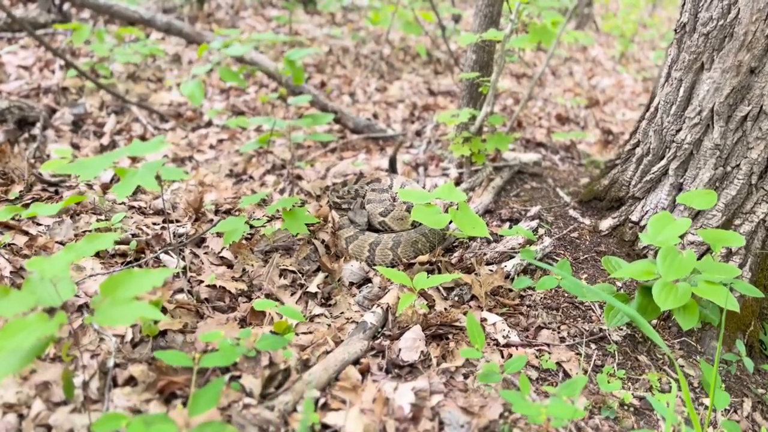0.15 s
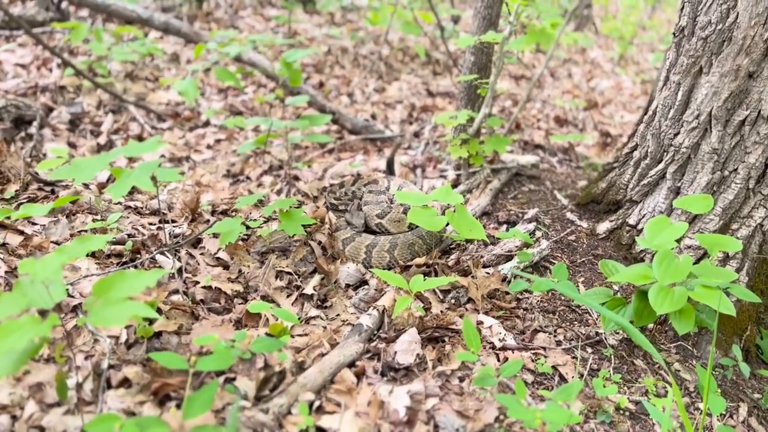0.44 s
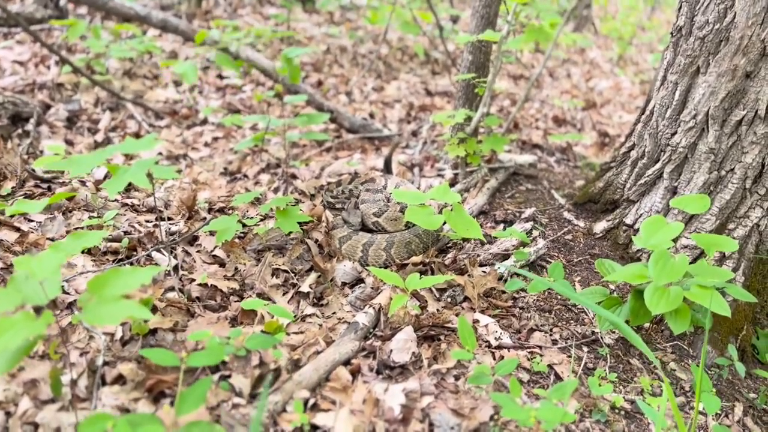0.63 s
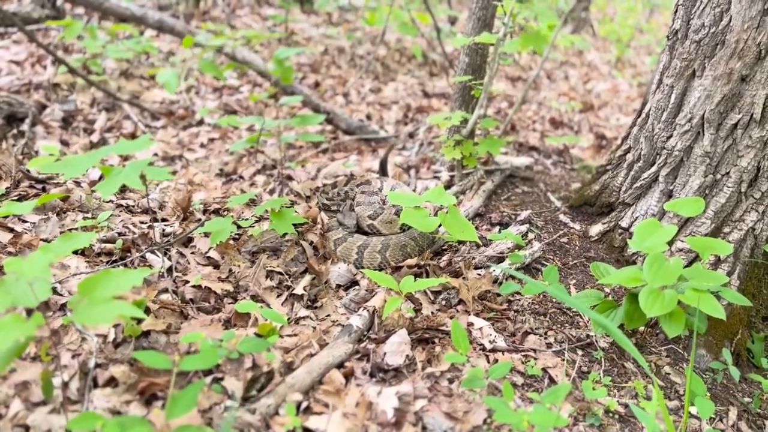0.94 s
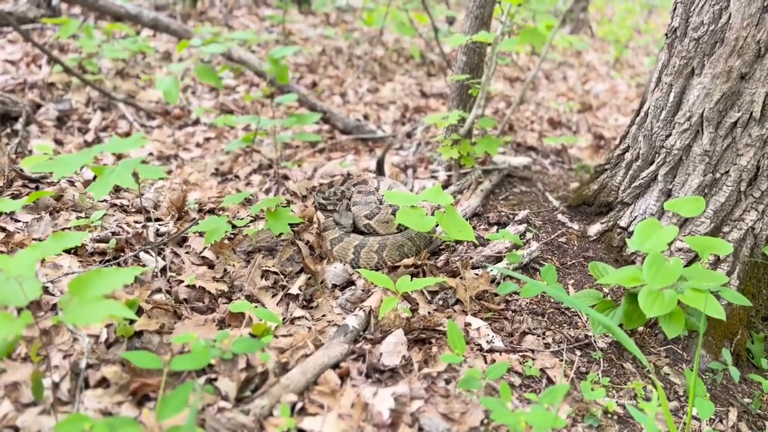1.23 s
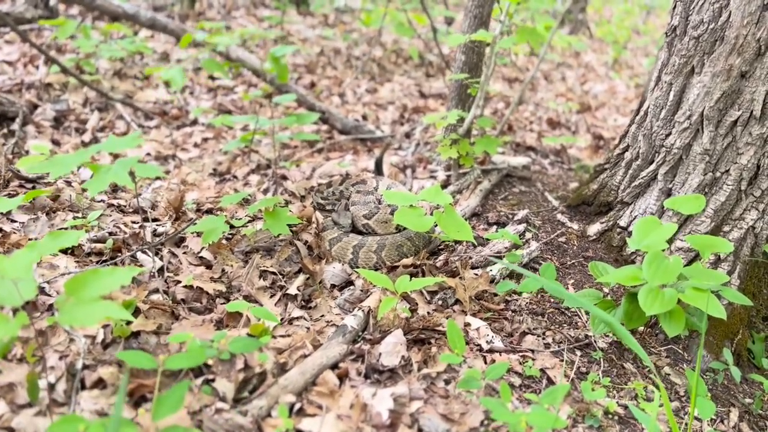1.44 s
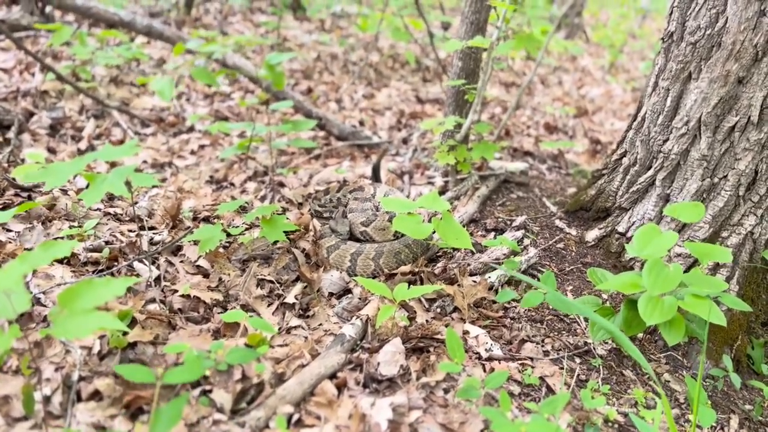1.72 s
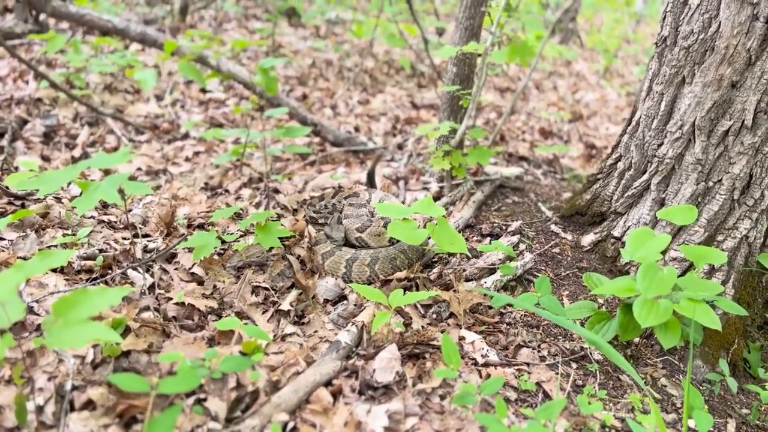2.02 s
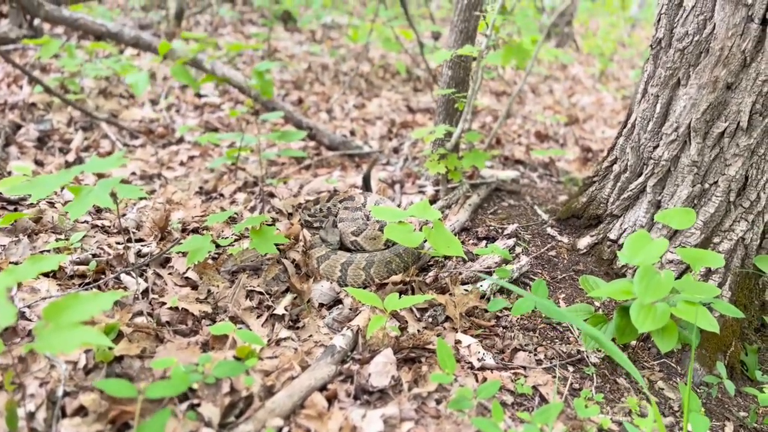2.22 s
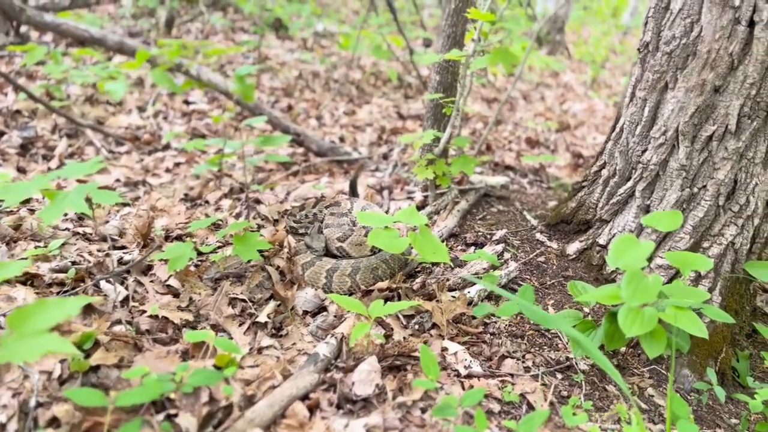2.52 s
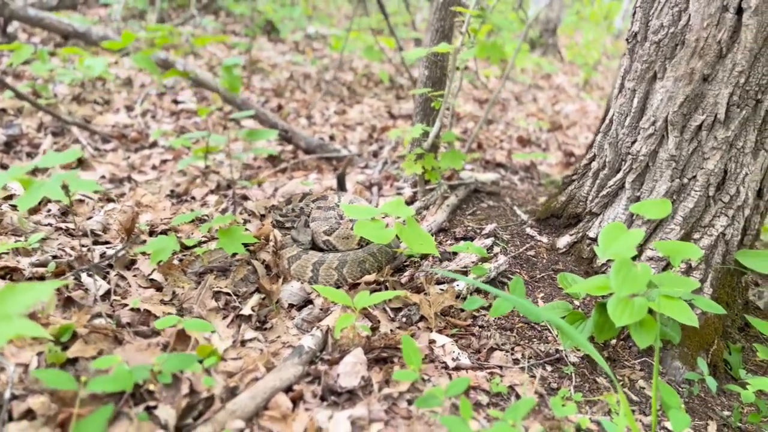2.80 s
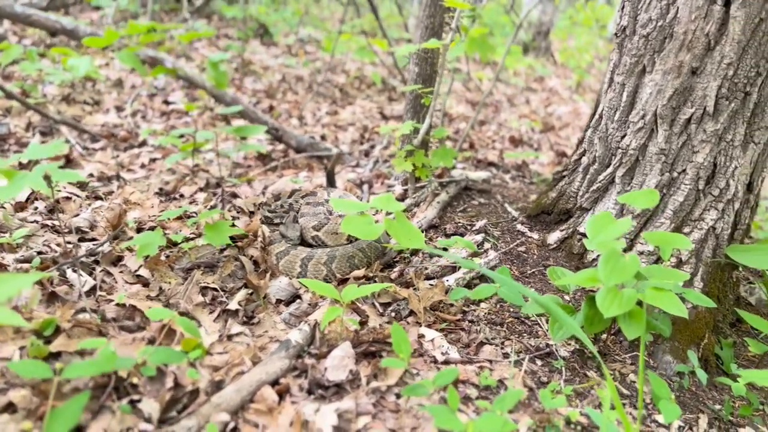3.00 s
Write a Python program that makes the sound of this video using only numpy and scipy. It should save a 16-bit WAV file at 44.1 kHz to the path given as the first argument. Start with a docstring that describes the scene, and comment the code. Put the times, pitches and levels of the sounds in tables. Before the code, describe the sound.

A rattlesnake shakes its tail in a fast, dry, high-pitched buzz that holds steady from start to finish. Beneath it, a quiet wood adds only a faint low rumble of air with a few soft bumps.

```python
"""A quiet wood: a rattlesnake on the leaf litter buzzes its tail without pause.
The tail swings fifty times a second; at each turn the loose horny segments clash.
The whole rattle knocks, the widest segments clack, the hollow shells chatter, the dry rims fizz.
Ground and trunks scatter the buzz, over a low rumble of air with soft bumps.
Faint tones swell and fade: a far hum, plus an overtone of the buzz near 850 Hz."""
import sys
import numpy as np
from scipy import signal
from scipy.fft import rfft, irfft
from scipy.io import wavfile

SR = 44100
rng = np.random.default_rng(int(sys.argv[2]) if len(sys.argv) > 2 else 0)


def generate_wav(signal):
    """Clip the signal to [-1, 1] and save it as 16-bit WAV at the path in sys.argv[1]."""
    frames = np.transpose(np.atleast_2d(signal))
    scaled = np.clip(frames, -1, 1) * 32767
    pcm = np.round(scaled).astype(np.int16)
    wavfile.write(sys.argv[1], SR, pcm)


N = 138915

# tail speed (time [s], swing rate [Hz])
SWING_RATE = [(0, 50.05), (.25, 49.75), (.45, 50.15), (1.2, 50.15), (1.6, 50.0), (2.2, 49.88),
              (3.15, 49.75)]
# clashes in one swing (place [swings], spread [swings], knock [dB], clack [dB], chatter [dB], fizz [dB])
CLASHES = [(.005, .022, -2.5, -0.5, 0.5, 1.5), (0.064, .02, -13, -3.5, -.5, -2.5),
           (0.331, .035, -4.5, -10, -7.5, -6), (.45, 0.044, -14, -7, -6.5, -2),
           (0.529, .025, -2.5, -7.5, -2.5, -.5), (.595, 0.023, -4.5, -9, -2, -6),
           (.8, .028, -5.5, -20, -5.5, -4.5), (0.921, 0.027, -3, 0.5, -1.5, -2)]
# whole rattle (frequency [Hz], level [dB])
KNOCK_SPECTRUM = [(200, -32.5), (550, -26), (800, -14), (1050, -6), (1300, 0), (1750, 1.5), (2080, -1),
                  (2320, 7), (2580, -2), (2900, 4), (3300, -2.5), (6000, -17)]
# widest segments (frequency [Hz], level [dB])
CLACK_SPECTRUM = [(500, -56), (2000, -26), (2650, -18), (2920, -9), (3210, -18.5), (3420, -3.5),
                  (3680, -1.5), (3850, -3), (4050, -5.5), (4500, -5.5), (5200, -13), (8000, -27.5)]
# hollow segments (frequency [Hz], level [dB])
SHELL_SPECTRUM = [(500, -74), (2000, -29), (3200, -19.5), (3900, -12), (4450, -5), (5500, -2), (7300, -2),
                  (8000, -5), (8500, -25), (11000, -21.5), (16000, -27)]
# hollow segment resonances (frequency [Hz], width [Hz], lift [dB])
SHELL_MODES = [(4875, 420, 6.5), (5270, 200, 1.2), (5836, 240, 6.2), (6410, 120, 3.2), (7010, 360, 3.3),
               (7830, 160, 2)]
# scraping rims (frequency [Hz], level [dB])
FIZZ_SPECTRUM = [(2000, -20.5), (5000, 0), (8000, -0.5), (9800, -.5), (10600, -1.5), (13000, -4),
                 (15100, -3.5), (15800, -1.5)]
# band of each rim (centre [Hz])
RIM_HZ = [6000, 8520, 9860, 11350, 12860, 14500]
# open-air rumble (frequency [Hz], level [dB])
AIR_SPECTRUM = [(15, 1.5), (30, 0.5), (65, -3), (95, -0.5), (120, 0.5), (175, -10), (215, -8), (300, -13.5),
                (520, -18.5), (1000, -16.5), (4000, -47)]
# far hum; last row: buzz overtone (frequency [Hz], level [dB], swell centre [s], swell width [s])
FAINT_TONES = [(420, -85, 1.42, 1), (477, -91, 0.48, 0.27), (723, -89, 0.56, 1), (855, -92, 2.8, 1.4)]
# bumps in the rumble (time [s], level [dB])
BUMPS = [(.16, -69), (.24, -62.5), (0.521, -64), (.88, -61), (1.009, -55), (2.099, -63), (2.41, -61),
         (2.56, -59), (2.75, -67), (2.962, -63)]

TIME_S = np.arange(N) / SR


def amp(db):
    """Decibels to gain."""
    return 10 ** (np.asarray(db) / 20)


def unit(x):
    """Scale to rms 1."""
    return x / np.sqrt(np.mean(x ** 2) + 1e-20)


def level_db(spectrum, hz):
    """Spectrum interpolated over log frequency."""
    points_hz, db = np.transpose(spectrum)
    return np.interp(np.log(hz + 1), np.log(points_hz), db)


def drift(hz):
    """Slow random motion up to about hz, rms 1."""
    bins_hz = np.fft.rfftfreq(N, 1 / SR)
    return unit(irfft(rfft(rng.standard_normal(N)) * (bins_hz > 0) * np.exp(-(bins_hz / hz) ** 2), N))


def ring(clicks, spectrum, modes=(), size=2048):
    """Clicks ring a minimum-phase body."""
    hz = abs(np.fft.fftfreq(size, 1 / SR))
    modes_db = sum(db / (1 + (2 * (hz - centre_hz) / width_hz) ** 2) for centre_hz, width_hz, db in modes)
    log_gain = np.log(amp(level_db(spectrum, hz) + modes_db))
    response = np.fft.ifft(np.exp(np.conj(signal.hilbert(log_gain)))).real
    return signal.oaconvolve(clicks, response[:size // 2])[:N]


def force(swings, clash_db, rest_db, rise_ratio=1.3):
    """Push between segments: each clash builds more slowly than it lets go."""
    power = amp(rest_db) ** 2
    for (place, spread, *_), db in zip(CLASHES, clash_db):
        away = (swings - place + .5) % 1 - .5
        width = spread * np.where(away < 0, rise_ratio, 1)
        power = power + amp(db) ** 2 * np.exp(-.5 * (away / width) ** 2)
    return unit(np.sqrt(power))


def contacts(push, rate_hz, spread_db):
    """Tiny random impacts, denser and harder with push; rate_hz holds at push 1."""
    hit = rng.random(N) < push * rate_hz / SR
    strength = amp(spread_db * np.clip(rng.standard_normal(N), -2, 2))
    return hit * strength * np.sqrt(push) * rng.choice([-1, 1], N)


def knock(swings, clash_db, jitter_s=.0003, spread_db=1.2, bounce_s=.000903, bounce_db=-3.5):
    """The whole rattle takes one blow and one rebound per clash, with rubbing around them."""
    rub = contacts(force(swings, clash_db, rest_db=-8), rate_hz=12000, spread_db=1.5)
    blows = np.zeros(N)
    for (place, *_), db in zip(CLASHES, clash_db):
        onsets = np.flatnonzero(np.diff(np.floor(swings - place)) > 0)
        late, hard, loose = rng.standard_normal((len(onsets), 3)).T
        for delay_s, drop_db in ((0, 0), (bounce_s * np.exp(.5 * loose), bounce_db)):
            at = onsets + np.round(SR * (jitter_s * late + delay_s)).astype(int)
            blows[np.clip(at, 0, N - 1)] += amp(db + drop_db + spread_db * hard)
    return ring(unit(blows) + amp(-2) * unit(rub), KNOCK_SPECTRUM)


def clack(swings, clash_db):
    """Impacts ring the widest segments."""
    push = force(swings, clash_db, rest_db=-6.5)
    return ring(contacts(push, rate_hz=6000, spread_db=2.5), CLACK_SPECTRUM)


def chatter(swings, clash_db):
    """Impacts ring the resonances of the hollow segments."""
    push = force(swings, clash_db, rest_db=-5)
    return ring(contacts(push, rate_hz=9000, spread_db=1), SHELL_SPECTRUM, SHELL_MODES)


def fizz(swings, clash_db, width_hz=2420, lift_db=20.5):
    """Dry rims scrape, each favouring its own band."""
    push = force(swings, clash_db, rest_db=-3.5)
    out = 0
    for hz in RIM_HZ:
        scrape = contacts(push, rate_hz=22000 / len(RIM_HZ), spread_db=4)
        out = out + ring(scrape, FIZZ_SPECTRUM, [(hz, width_hz, lift_db)])
    return out


def rattle(first_turn_s=.0045, stroke_spread_db=.17, drift_db=.04):
    """The swinging tail drives the segments, each stroke with slightly different effort."""
    swing_hz = np.interp(TIME_S, *np.transpose(SWING_RATE))
    swings = np.cumsum(swing_hz) / SR - first_turn_s * swing_hz[0]
    stroke = np.round(2 * swings).astype(int)
    effort = amp(stroke_spread_db * rng.standard_normal(N)[stroke] + drift_db * drift(hz=5.5))
    _, _, knock_db, clack_db, chatter_db, fizz_db = np.transpose(CLASHES)
    return effort * (amp(-58) * unit(knock(swings, knock_db))
                     + amp(-46) * unit(clack(swings, clack_db))
                     + amp(-39) * unit(chatter(swings, chatter_db))
                     + amp(-43.5) * unit(fizz(swings, fizz_db)))


def scatter(buzz, paths=10, delay_s=.0033, t60_s=.77):
    """Ground, leaves and trunks return the buzz; the paths crossfade as the tail moves."""
    age_s = np.arange(SR // 2) / SR
    position = np.linspace(0, paths - 1, N)
    out = 0
    for path in range(paths):
        share = np.cos(np.pi / 2 * np.clip(position - path, -1, 1))
        echo = rng.standard_normal(len(age_s)) * (age_s > delay_s) * amp(-60 * age_s / t60_s)
        out = out + signal.fftconvolve(buzz * share, echo / np.linalg.norm(echo))[:N]
    return out


def air():
    """Steady low rumble of moving air."""
    gain = amp(level_db(AIR_SPECTRUM, np.fft.rfftfreq(N, 1 / SR)))
    return unit(irfft(rfft(rng.standard_normal(N)) * gain, N))


def faint_tones(waver_db=3.5, waver_hz=.86):
    """Swelling, wavering sines: a far hum, plus an overtone of the buzz near 850 Hz."""
    out = 0
    for hz, db, centre_s, width_s in FAINT_TONES:
        swell = np.exp(-.5 * ((TIME_S - centre_s) / width_s) ** 2) * amp(waver_db * drift(hz=2))
        cycles = np.cumsum(hz + waver_hz * drift(hz=3.9)) / SR
        out = out + amp(db) * unit(swell * np.sin(2 * np.pi * cycles))
    return out


def bumps(nominal_hz=105.4, width_s=.0067):
    """Short, dull swells of a cycle or two."""
    out = 0
    for centre_s, db in BUMPS:
        offset_s = TIME_S - centre_s
        hz = nominal_hz * rng.uniform(.71, 1.13)
        swell = np.exp(-.5 * (offset_s / width_s) ** 2)
        out = out + amp(db) * swell * np.sin(2 * np.pi * (hz * offset_s + rng.random()))
    return out


def scene():
    """Snake, scatter and quiet wood, in mono."""
    buzz = rattle()
    return (buzz + amp(-11) * scatter(buzz) + amp(-65.5) * air() + faint_tones() + bumps())[None]


def record(dry):
    """Steep low-pass."""
    cutoff_hz = 15720
    taps = signal.firwin(1023, cutoff_hz, window=("kaiser", 9), fs=SR)
    return signal.oaconvolve(dry, taps[None], "same")


dry = scene()
out = record(dry)
generate_wav(out)
```